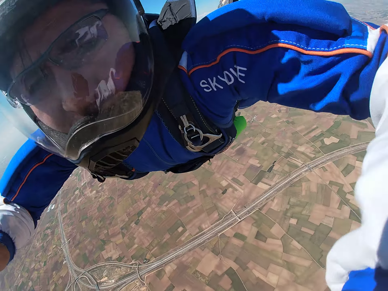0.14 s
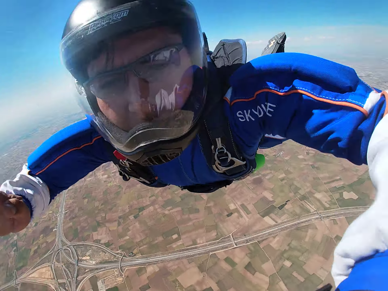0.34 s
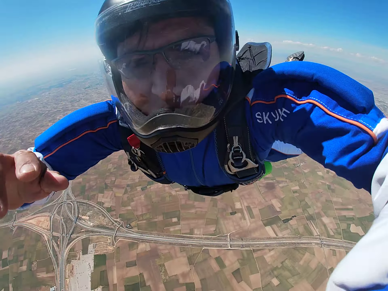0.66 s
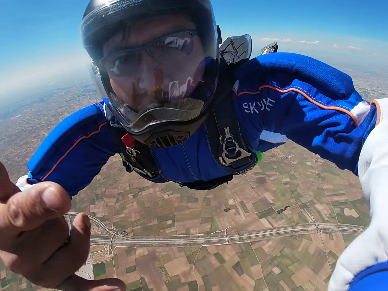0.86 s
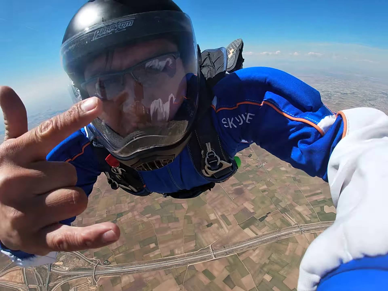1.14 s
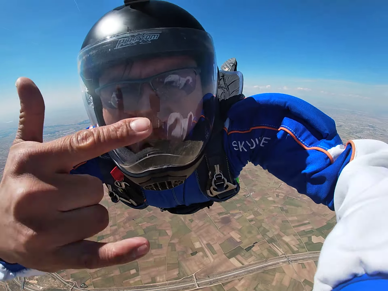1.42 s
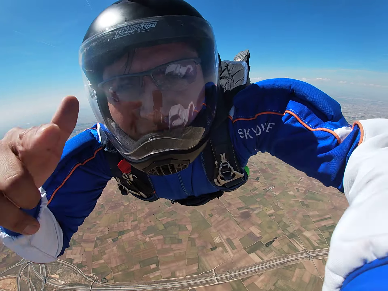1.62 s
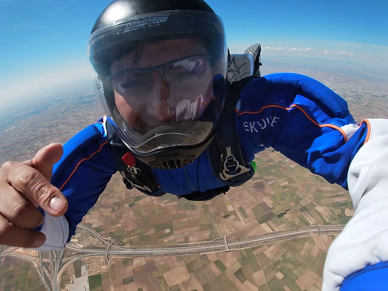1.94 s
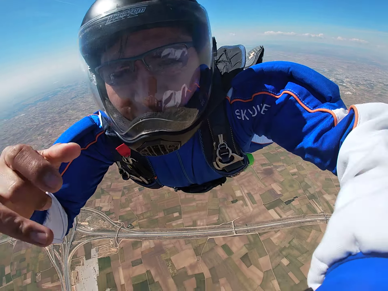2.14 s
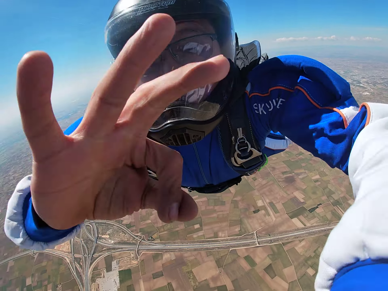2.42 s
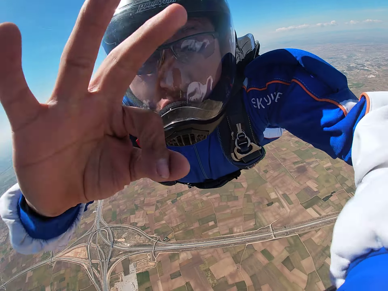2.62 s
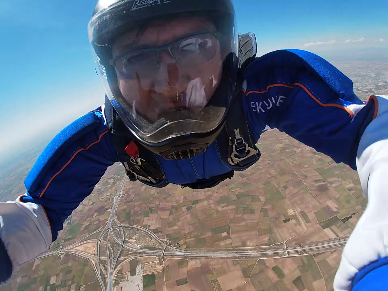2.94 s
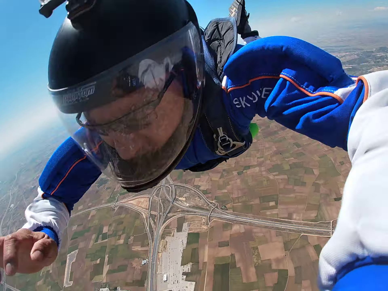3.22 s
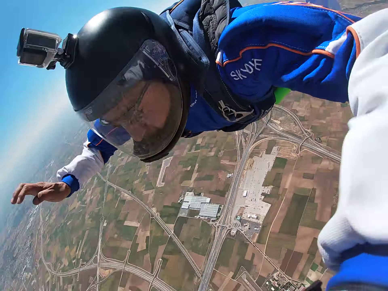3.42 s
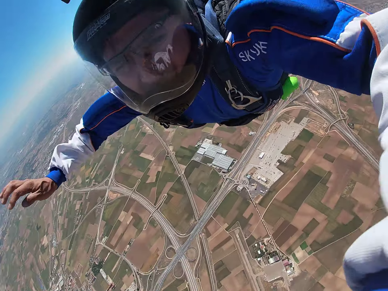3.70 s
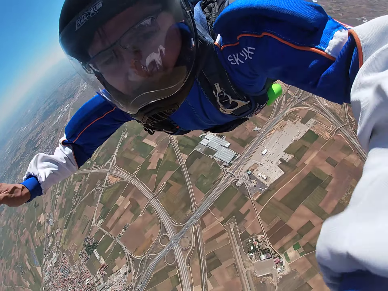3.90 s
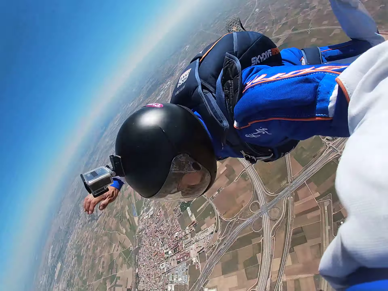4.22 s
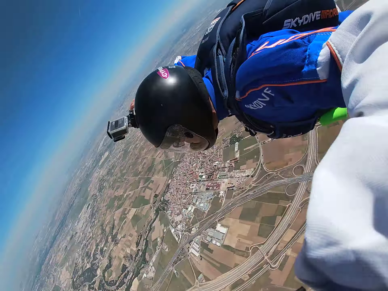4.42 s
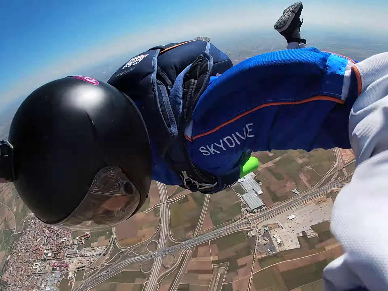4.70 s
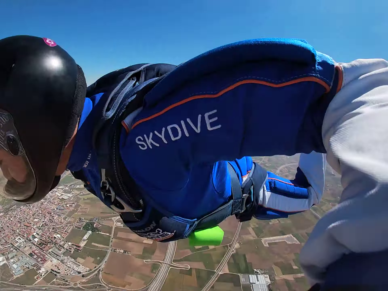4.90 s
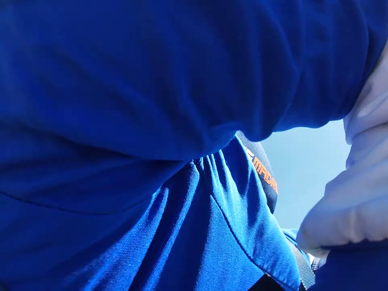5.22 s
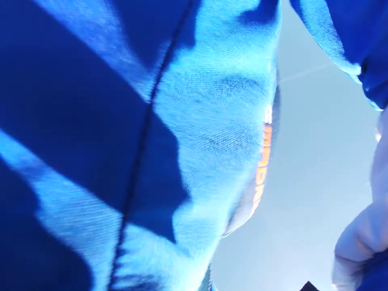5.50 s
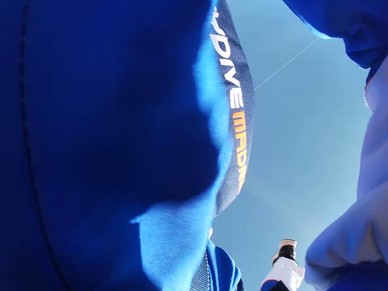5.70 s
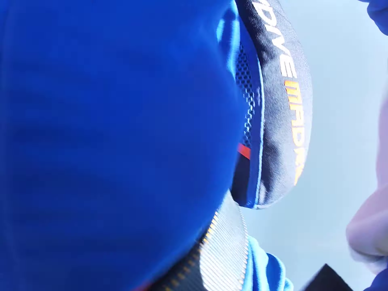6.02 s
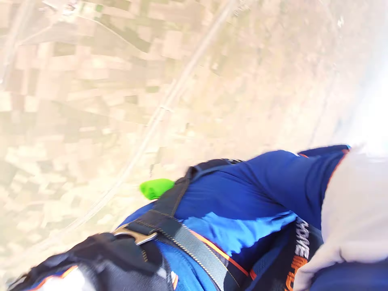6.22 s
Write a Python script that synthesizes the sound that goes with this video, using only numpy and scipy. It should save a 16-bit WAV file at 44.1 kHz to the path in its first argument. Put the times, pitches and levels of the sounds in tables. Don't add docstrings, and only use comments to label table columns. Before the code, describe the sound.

High in open sky, air tears past a hand-held camera, roaring and buffeting its microphone. A loose sleeve beside it flutters so fast that its thumps and bright cracks merge into a rough, rattling buzz, strongest around two seconds. The flapping weakens past the middle and stops after five seconds, leaving deep gusty wind, a few small dry ticks and slow thudding shoves of air at the end.

```python
import sys
import numpy as np
from scipy import signal
from scipy.io import wavfile
from scipy.ndimage import uniform_filter1d

SR = 44100
rng = np.random.default_rng(int(sys.argv[2]) if len(sys.argv) > 2 else 0)


def generate_wav(sig):
    pcm = np.round(np.clip(np.atleast_2d(sig).T, -1, 1) * 32767).astype(np.int16)
    wavfile.write(sys.argv[1], SR, pcm)


def volts_from_decibels(level):
    exponent = np.asarray(level, float) / 20
    return 10 ** exponent


N = 280029

# t/s, force/dB, tautness as brightness/dB
CRACK = [(0, -28.5, -14), (.36, -36.5, -13), (.65, -29, -7.5), (1.1, -25, -13.5), (1.75, -22, -11.5),
         (2.3, -25.5, -11), (2.75, -28, -10.5), (3.3, -27.5, -12.5), (3.84, -29.5, -20), (3.96, -40, -12),
         (4.2, -35, -8.5), (4.3, -46, -3), (4.42, -44, -4), (4.65, -52, 2), (4.82, -32, -10.5),
         (5.0, -42.5, -3.5), (5.2, -45, -11.5)]
# t/s, body/dB, edge/dB
HARD_SNAPS = [(0.0529, -35, -28), (0.069, -22, -37), (0.4497, -29, -28.5), (0.5266, -18.5, -30.5),
              (0.5613, -18.5, -30.5), (0.5898, -20, -39.5), (0.6058, -28.5, -30), (0.6204, -24.0, -37),
              (0.639, -20, -34), (0.6537, -20.5, -30.0), (0.6674, -20.0, -36.5), (0.6854, -17.5, -35.0),
              (0.7013, -21, -25), (0.7149, -28.0, -32.5), (0.7318, -20, -36.5), (0.75, -26.5, -26),
              (0.785, -22.5, -28.5), (0.8097, -26.5, -31), (0.8602, -31.0, -35), (0.9065, -23.5, -27.5),
              (0.927, -16, -27.5), (0.9533, -28, -27), (0.9852, -24.5, -24), (1.0176, -29.5, -29.0),
              (1.0327, -24, -33), (1.0478, -22.5, -39), (1.0777, -35, -31.5), (1.1086, -22.0, -27.5),
              (1.1392, -22.5, -27), (1.2322, -21.0, -25), (1.2464, -26, -30.5), (1.3069, -26, -30),
              (1.3529, -25, -26.5), (1.385, -25, -29), (1.3998, -22, -27), (1.416, -23, -36),
              (1.4294, -25, -30), (1.4458, -23, -28), (1.4765, -22, -30.5), (1.492, -31, -25),
              (1.5068, -26, -29), (1.5196, -20, -30.0), (1.5518, -27, -24), (1.5684, -24, -24),
              (1.5828, -22, -27), (1.5976, -21, -25), (1.6158, -19.0, -25), (1.6265, -22, -24),
              (1.6444, -17, -24.5), (1.6598, -24, -30), (1.6914, -19, -24), (1.7048, -22.5, -26),
              (1.734, -25.0, -23), (1.7517, -20, -38), (1.7658, -17.5, -30.0), (1.7815, -25, -22.5),
              (1.799, -24, -31), (1.815, -20, -28), (1.8439, -26, -24), (1.86, -20, -25.5)]
# t/s, body/dB, edge/dB
LATE_SNAPS = [(1.9029, -17.5, -22.5), (1.9173, -24, -22.5), (1.9494, -14, -24), (1.9812, -18, -36),
              (2.03, -19.5, -20), (2.0431, -23.0, -26), (2.0707, -30, -26), (2.105, -21.5, -28.5),
              (2.118, -20, -24), (2.2128, -17, -27), (2.225, -11.5, -25.5), (2.244, -18, -26),
              (2.2678, -21.5, -24), (2.3045, -22, -23), (2.3542, -25, -27), (2.3936, -23, -40),
              (2.4577, -21.5, -25.5), (2.473, -20, -27.5), (2.5098, -28, -29), (2.5191, -18.5, -31.5),
              (2.536, -23, -27.5), (2.5806, -23, -30.5), (2.6125, -17.5, -24), (2.6408, -24, -30.5),
              (2.6587, -18, -35.0), (2.675, -29, -32.5), (2.7085, -26, -32.5), (2.7184, -32, -26),
              (2.7373, -15, -27.5), (2.752, -30, -28), (2.7675, -16, -28), (2.7833, -23, -31.5),
              (2.7988, -27.5, -31.0), (2.8173, -20, -29), (2.8306, -26, -36), (2.8475, -35, -38),
              (2.862, -19.5, -27), (2.8937, -19.5, -25), (2.9418, -21, -34.0), (2.9587, -20, -36),
              (3.0067, -34, -27.5), (3.0208, -24, -31), (3.0342, -24.5, -33), (3.065, -24.0, -31),
              (3.0964, -23.5, -34), (3.113, -24, -27), (3.1274, -23, -31.5), (3.1426, -22.5, -32.5),
              (3.1585, -29, -35), (3.1734, -38, -28.5), (3.188, -16, -31), (3.207, -23, -29),
              (3.221, -24.0, -29.5), (3.2378, -28, -32.5), (3.254, -26.5, -30), (3.2687, -17.5, -31.0),
              (3.288, -25.0, -29.5), (3.3308, -21, -29), (3.3804, -17.5, -25.5), (3.428, -24.5, -31)]
# t/s, body/dB, edge/dB
SWING_SNAPS = [(3.531, -31, -44), (3.5463, -26, -44), (3.5803, -27, -46), (3.6018, -24, -27),
               (3.6182, -29.0, -37.5), (3.6733, -22.5, -38.0), (3.6852, -25, -38), (3.7225, -29, -32),
               (3.7407, -23, -38), (3.7787, -22, -30.5), (3.811, -21, -31), (3.937, -28.5, -35),
               (4.0076, -28, -33), (4.0726, -39, -40), (4.1582, -32.5, -40), (4.2057, -29.0, -39.0),
               (4.2246, -46.0, -41), (4.2461, -33.5, -47), (4.2657, -32.5, -43.5), (4.2888, -34, -46.0),
               (4.3283, -41, -52), (4.3459, -28.0, -44), (4.3675, -34, -40), (4.3848, -28.0, -38.5),
               (4.4024, -33, -40.0), (4.4227, -38, -40), (4.439, -34, -38.5), (4.459, -31, -41.5),
               (4.4737, -37, -39), (4.4938, -31.0, -39.5), (4.5082, -41, -40), (4.528, -36, -38.0),
               (4.54, -29.5, -41), (4.5638, -30, -39), (4.5803, -45, -39.5), (4.5967, -30, -39),
               (4.6637, -34, -42.5), (4.698, -23.5, -36.5), (4.749, -25.0, -31), (4.7822, -22.0, -37),
               (4.7977, -27.5, -30), (4.8132, -25, -28), (4.832, -33.5, -35.0), (4.846, -17.5, -37),
               (4.863, -36, -39), (4.8798, -23.5, -44), (4.8928, -26, -37), (4.9254, -40, -34),
               (4.9408, -29, -37), (5.0046, -32, -37.0), (5.0213, -57, -35.5), (5.0438, -38, -45),
               (5.059, -26, -34.5), (5.0914, -26, -36), (5.113, -32, -37.5), (5.1304, -29, -38),
               (5.1581, -36, -46), (5.1985, -25.0, -42), (5.2138, -28.5, -39.5), (5.2374, -20, -27)]


def rms_one(x):
    return x / np.sqrt(np.mean(x ** 2) + 1e-20)


def in_time(rows):
    s, *columns = np.transpose(rows)
    return [np.interp(np.arange(N) / SR, s, c) for c in columns]


def bells(rows, heights):
    s, length = np.array(rows)[:, :2].T
    t = np.arange(0, N / SR + .002, .002)
    swell = np.exp(-.5 * ((t[:, None] - s) / length) ** 2) @ heights
    return np.interp(np.arange(N) / SR, t, swell)


def drift(rate):
    r = np.exp(-80 * np.pi * rate / SR)
    slow = signal.lfilter([1], [1, -2 * r, r * r], rng.standard_normal(N // 40 + 2002))[2000:]
    return np.interp(np.arange(N) / 40, np.arange(len(slow)), rms_one(slow))


def noise_bands(colour, low_hz, clicks):
    edges = low_hz * 2 ** np.arange(0, np.log2(13000 / low_hz), .4)
    white = rng.standard_normal((2, N + SR)) + np.pad(clicks, (SR, 0))
    log_hz, level_db = np.log(np.array(colour)[:, 0]), np.array(colour)[:, 1]
    for k, (low, high) in enumerate(zip(edges, edges[1:])):
        band_pass = signal.butter(3, [low, high], "band", fs=SR, output="sos")
        band = signal.sosfilt(band_pass, white[k % 2])[SR:]
        hz = np.sqrt(low * high)
        yield hz, volts_from_decibels(np.interp(np.log(hz), log_hz, level_db)) * band


def flap_turns():
    # t/s, flaps per second/Hz
    flap_rate = [(0.0, 65.21), (0.45, 61.98), (0.6, 63.92), (0.9, 62.48), (1.05, 65.27), (1.8, 65.71),
                 (1.95, 63.77), (2.1, 65.76), (2.85, 63.74), (3.3, 64.06), (3.6, 56.35), (4.05, 57.78),
                 (4.2, 48.38), (4.5, 56.83), (4.95, 63.33), (5.25, 55.34)]
    return np.cumsum(in_time(flap_rate)[0]) / SR + .475


def flap_phase(turns):
    s = np.array(HARD_SNAPS + LATE_SNAPS + SWING_SNAPS)[:, 0]
    hard = turns[(s * SR).astype(int)]
    return turns - np.interp(turns, hard, hard - np.round(hard + .08))


def slack():
    return np.clip((5.27 - np.arange(N) / SR) / .04, 0, 1)


def stream_swells():
    # t/s, level/dB
    flow = [(0, -1.5), (.4, 1), (.75, -3), (1.25, -0.5), (1.6, 1), (1.95, 4.5), (2.3, 4.5), (2.55, 2.5),
            (3.2, -1.5), (3.65, -0.5), (3.95, -1), (4.2, -1.5), (4.5, 1.5), (5.0, -0.5), (5.3, 4.5),
            (5.7, 6), (6.2, 7), (6.31, 9)]
    follow_flow = [0.37, 0.78, 1.3, 1.06]
    # t/s, length/s, large eddies/dB, fine eddies/dB
    gusts = [(0.093, 0.011, 7.5, 0), (0.135, 0.012, -10.5, 5.5), (0.466, 0.053, -1.5, 1),
             (1.083, 0.23, 1, 0.5), (1.144, 0.0097, -3, 5), (1.367, 0.015, -2.5, 7),
             (1.714, 0.089, 2.5, -1), (1.924, 0.074, -1, -1), (2.465, 0.13, 1.5, -3),
             (2.693, 0.015, -3, -11.5), (3.529, 0.047, 0, -3), (4.043, 0.069, -3, 0.5),
             (4.151, 0.036, 3.5, 3.5), (4.297, 0.052, 1.5, -19.5), (4.5, 0.23, -3, -14.5),
             (4.856, 0.055, 1.5, 5), (4.984, 0.043, -2.5, -1.5), (5.136, 0.1, 0.5, -10.5),
             (5.248, 0.014, 0.5, 7), (5.266, 0.019, -2.5, -21.5), (5.353, 0.05, -2, -3.5),
             (5.473, 0.042, 5, -4), (5.572, 0.13, -9, -4.5), (5.619, 0.031, 2, -6), (5.702, 0.017, 1, 6.5),
             (6.101, 0.086, 1.5, -1.5), (6.188, 0.015, -1, -2.5), (6.214, 0.0088, 0, -3),
             (6.216, .045, -4, -1.5), (6.26, 0.02, -4.5, 1.5), (6.291, 0.051, -16, -16)]
    feel_gusts = [(1, 0.065), (0.46, 0.085), (0.012, 0.55), (0.26, 1)]
    # t/s, length/s, roar/dB, rush/dB
    rollers = [(0.198, 0.089, -2.5, 3.5), (0.429, 0.027, 2.5, 6.5), (0.711, 0.088, 3.5, 2.5),
               (0.869, 0.024, 2.5, -3.5), (0.972, .03, 0, 7.5), (1.25, 0.057, -2, -2.5),
               (1.442, .04, -0.5, -2.5), (1.627, 0.058, 2, -0.5), (1.819, 0.054, 1, 2),
               (2.117, 0.055, 0.5, -1), (2.432, 0.044, -1, 0), (2.993, 0.027, 8.5, -3),
               (3.194, 0.045, 4, 2.5), (3.598, 0.086, -1.5, -5), (3.965, 0.057, -1.5, 2.5),
               (4.116, 0.058, -5.5, 1), (4.331, 0.066, -1.5, 5.5), (4.697, 0.02, 2, 3.5),
               (5.264, 0.022, 0.5, 11.5), (5.327, 0.013, -4, -10), (5.396, 0.034, -1, -1.5),
               (5.582, 0.067, -1.5, 3), (5.762, 0.027, -1, 0), (5.943, 0.09, 3, 1),
               (6.135, 0.047, 4.5, 1.5), (6.191, 0.045, -5, 1), (6.258, 0.021, 3.5, -5.5),
               (6.303, 0.02, -4.5, 7), (6.345, 0.011, 0.5, -2.5)]
    gust_db = np.array([bells(gusts, db) for db in np.transpose(gusts)[2:]])
    swells = np.outer(follow_flow, in_time(flow)[0]) + feel_gusts @ gust_db
    swells[1:3] += [bells(rollers, db) for db in np.transpose(rollers)[2:]]
    return swells - swells.mean(axis=1, keepdims=True)


def stream(turns, own_db=1.5, level_db=-13.5, lee_dull_db=-6.0, shield_hz=2300, shield_octaves=1.35):
    # f/Hz, level/dB
    stream_colour = [(9, -40), (15, -13.5), (27, -9.5), (54, -5), (87, -1), (125, -2.5), (170, -5.5),
                     (394, -14), (656, -25), (1320, -33), (3000, -42.5), (5300, -56), (7000, -69.5),
                     (9200, -77), (12500, -102)]
    # f/Hz, size/1 (0 buffet, 1 roar, 2 rush)
    eddy_size = [(120, 0), (300, 1), (800, 2)]
    # t/s, f/Hz
    hiss_edge = [(0, 2050), (5.15, 1945), (5.26, 3260), (5.3, 2305), (5.45, 2770), (5.53, 3800),
                 (5.58, 2310), (5.66, 2315), (6.1, 3160), (6.19, 3140), (6.22, 1684), (6.3, 2024),
                 (6.35, 1610)]
    # t/s, share/1
    shade = [(0, 0.56), (.6, 0.87), (1.2, 1), (1.7, 1.6), (2.1, 0.68), (2.5, 1.9), (2.8, 2.1), (3.2, 1),
             (3.7, 0.75), (4.1, 0.6), (4.4, 1.6), (4.65, 1.1), (4.85, .8), (5.1, 1.3)]
    clump_db, shield_db = .8, -1.5
    swells = stream_swells()
    clumps = 1.2 * drift(9) + 1.4 * drift(40)
    lee, edge_hz = 1 - slack(), in_time(hiss_edge)[0]
    between_flaps = 1 - np.cos(2 * np.pi * (flap_phase(turns) - .05))
    shield = between_flaps * slack() * in_time(shade)[0]
    size_hz, size_step = np.transpose(eddy_size)
    out = np.zeros(N)
    for hz, band in noise_bands(stream_colour, low_hz=15.985, clicks=np.zeros(N)):
        size = np.interp(np.log(hz), np.log(size_hz), size_step)
        weights = .5 + .5 * np.cos(np.pi * np.clip(size - np.arange(4), -1, 1))
        hissy = np.clip(.5 + np.log2(hz / edge_hz) / .3, 0, 1)
        swell_db = weights @ swells + hissy * (swells[3] - swells[2])
        clumpy = np.clip(np.log2(hz / 250), 0, 1)
        shade_db = shield_db * np.exp(-(np.log2(hz / shield_hz) / shield_octaves) ** 2) * shield
        shade_db += lee_dull_db * max(np.log2(hz / 4000), 0) * lee
        chance_db = clump_db * clumpy * clumps + own_db * drift(30.0)
        out += band * volts_from_decibels(swell_db + chance_db + shade_db)
    return volts_from_decibels(level_db) * rms_one(out)


def shoves():
    # t/s, peak/1, length/s
    shove_rows = [
        (6.159, -0.25, 0.00107),
        (6.164, 0.53, 0.0018),
        (6.181, .4, 0.002),
        (6.188, -.25, 0.0037),
        (6.198, .4, 0.0033),
        (6.221, -0.49, 0.0015),
        (6.237, -.35, 0.0035),
        (6.247, .3, 0.0032),
        (6.3505, 0.28, .002),
    ]
    t = np.arange(N) / SR
    return sum(peak * np.exp(-.5 * ((t - s) / length) ** 2) for s, peak, length in shove_rows)


def whistle(width_hz=260):
    # t/s, length/s, rms level/dB
    spells = [
        (2.37, .02, -58),
        (2.405, .008, -46),
        (2.48, .015, -46),
        (2.545, .014, -44.5),
        (2.592, .012, -47),
    ]
    waver = drift(width_hz) + 1j * drift(width_hz)
    tone = np.real(waver * np.exp(2j * np.pi * 3800 * np.arange(N) / SR)) / np.sqrt(2)
    return bells(spells, volts_from_decibels(np.array(spells)[:, 2])) * tone


def strap():
    # t/s, peak/dB
    ticks = [
        (5.482, -33),
        (5.489, -34),
        (5.5, -33),
        (5.51, -37),
        (5.52, -33),
        (6.207, -30),
        (6.236, -31),
    ]
    clicks = np.full(N, 1e-18)
    for s, peak_db in ticks:
        clicks[int(s * SR)] = 8 * volts_from_decibels(peak_db)
    return signal.sosfilt(signal.butter(4, (2600, 4800), "band", fs=SR, output="sos"), clicks)


def thump(turns, wander=0.42, lag_1=0.27, lag_2=0.14, lag_3=0.11):
    # t/s, length/s, rms level/dB
    swings = [(0.672, 0.17, -14), (1.09, 0.14, -22), (1.55, 0.058, -24.5), (1.99, 0.023, -14.5),
              (2.716, 0.26, -16.5), (3.206, 0.27, -19.5), (3.703, 0.19, -16), (4.017, 0.068, -16.5),
              (4.273, 0.07, -18), (4.558, 0.12, -12.5), (4.863, 0.13, -15.5)]
    # t/s, length/s, rms level/dB
    folds = [
        (0.344, 0.14, -16.5),
        (0.992, 0.042, -25),
        (1.547, 0.09, -31),
        (2.003, 0.068, -18),
        (2.634, 0.086, -14),
        (3.15, 0.11, -14),
        (3.812, 0.16, -19),
        (4.76, 0.34, -21),
    ]
    # t/s, length/s, rms level/dB
    ripples = [
        (0.077, 0.068, -18.5),
        (.42, 0.071, -23.5),
        (0.585, 0.044, -23),
        (.95, .05, -29),
        (1.29, 0.15, -24),
        (1.8, .08, -30.5),
        (3.154, 0.067, -28),
    ]
    out = np.zeros(N)
    for order, lag, spells in zip((1, 2, 3), (lag_1, lag_2, lag_3), (swings, folds, ripples)):
        shake = 1 + wander * (drift(8.8) + 1j * drift(9.9))
        height = bells(spells, volts_from_decibels(np.array(spells)[:, 2]))
        out += height * np.sqrt(2) * np.real(shake * np.exp(2j * np.pi * (order * turns + lag)))
    return out


def flaps(turns, late=0.033, usual_body_db=4.5, usual_edge_db=5.5, hard_body_db=-0.16, hard_edge_db=-0.83,
          early=0.044, limp=2.1):
    # t/s, change/dB before the factor limp
    odd_flaps = [(0.796, -2), (0.827, -2.5), (0.875, -0.5), (0.891, -10), (1.063, -15.5), (1.186, -2.5),
                 (1.262, -4), (1.278, -10), (1.293, 1.5), (1.323, -3), (1.415, -1), (1.537, 0.5),
                 (1.583, -6), (1.659, 0), (1.674, -22), (1.827, -21), (1.873, -2.5), (1.982, -3),
                 (1.998, -8), (2.09, -11), (2.196, -3.5), (2.319, 1.5), (2.334, -9), (2.38, -18),
                 (2.411, -20), (2.55, -7), (2.566, -17), (2.69, -16), (2.925, -10), (3.347, -7),
                 (3.363, -4), (3.564, -9), (3.793, -0.5), (4.037, -2), (4.306, -3), (4.613, 0),
                 (4.63, 1.5), (4.764, -5), (4.91, -1), (5.038, -5), (5.071, 4.5), (5.122, 0)]
    uneven_db = 0.3
    chance = rng.standard_normal((int(turns[-1]) + 2, 2))
    taut = np.arange(len(chance)) - 0.12 + late * chance[:, 0]
    sample = np.searchsorted(turns, taut).clip(0, N - 1)
    level_db, bright_db = (c[sample] for c in in_time(CRACK))
    level_db = level_db + uneven_db * chance[:, 1]
    for s, loss_db in odd_flaps:
        level_db[int(round(turns[int(s * SR)]))] += limp * loss_db
    s, body_db, edge_db = np.transpose(HARD_SNAPS + LATE_SNAPS + SWING_SNAPS)
    hard = turns[(s * SR).astype(int)] - early
    free = np.abs(taut[:, None] - hard).min(axis=1) > .6
    usual = np.array([taut, level_db + usual_body_db, level_db + bright_db + usual_edge_db])[:, free]
    rows = np.hstack([usual, [hard, body_db + hard_body_db, edge_db + hard_edge_db]])
    return rows[:, np.argsort(rows[0])]


def flap_power(x, burst, flap, count):
    energy = np.bincount(flap, (x * burst) ** 2, count)
    return energy / (np.bincount(flap, burst ** 2, count) + 1e-9) + 1e-20


def crack(turns, rise=0.072, body_fall=0.19, edge_fall=0.15, ragged=0.18, tilt=0.73, even=0.58):
    # f/Hz, level/dB
    crack_colour = [(300, -4.5), (570, 5), (1000, -3.5), (2000, -8.5), (2900, -12), (3900, -19.5),
                    (5500, -32), (7000, -39.5), (12500, -84.5)]
    edge_from_hz, cloth_cut_hz = 1650, 7500
    tint_db, snap_click = 0.74, 1.7
    taut, *levels_db = flaps(turns)
    count = len(taut)
    chance = rng.standard_normal((count, 24))
    flap = np.searchsorted(taut - .3, turns).clip(1) - 1
    since = turns - taut[flap]
    starts = np.diff(since > 0, prepend=False) * (since > 0)
    clicks = snap_click * starts * np.sign(chance[flap, -1])
    bursts = []
    for fall in (body_fall, edge_fall):
        width = np.where(since < 0, rise, fall * np.exp(ragged * chance[flap, -2]))
        bursts.append(np.exp(-.5 * (since / width) ** 2))
    parts, bright_db = np.zeros((2, N)), in_time(CRACK)[1]
    for k, (hz, band) in enumerate(noise_bands(crack_colour, low_hz=308.3, clicks=clicks)):
        part = int(hz > edge_from_hz)
        tint = chance[:, 2 + k // 2] + chance[:, 2 + (k + 1) // 2]
        power = flap_power(band, bursts[part], flap, count)
        solid = (np.mean(band ** 2) / power) ** (even / 2)
        slope_db = tilt * (bright_db + 6.0) * max(np.log2(hz / edge_from_hz), 0)
        band_height = uniform_filter1d((volts_from_decibels(tint_db * tint) * solid)[flap], size=60)
        parts[part] += band * band_height * volts_from_decibels(slope_db)
    heights = []
    for part, burst, level_db in zip(parts, bursts, levels_db):
        strength = volts_from_decibels(level_db) / np.sqrt(flap_power(part, burst, flap, count))
        heights.append(burst * strength[flap])
    out = np.sum(parts * uniform_filter1d(heights, size=44), axis=0) * slack()
    return signal.sosfilt(signal.butter(4, cloth_cut_hz, fs=SR, output="sos"), out)


def scene():
    turns = flap_turns()
    air = stream(turns) + shoves() + whistle()
    sleeve = thump(turns) + crack(turns)
    return (air + strap() + sleeve)[None]


def low_pass(x):
    return signal.sosfilt(signal.butter(12, 12500, fs=SR, output="sos"), x)


def record(dry):
    limit_db, release_db_per_s, ceiling = -6, 93, 1.5
    ramp = release_db_per_s * np.arange(N) / SR
    over_db = np.maximum(20 * np.log10(np.abs(dry[0]) + 1e-9) - limit_db, 0)
    held_db = np.maximum.accumulate(over_db + ramp) - ramp
    duck_db = uniform_filter1d(uniform_filter1d(held_db, size=220), size=220)
    opening = np.minimum(np.arange(N) / 60, 1)
    held = dry * volts_from_decibels(-.6 * duck_db) * opening
    rounded = ceiling * np.tanh(held / ceiling)
    return low_pass(rounded)


dry = scene()
out = record(dry)
generate_wav(out)
```